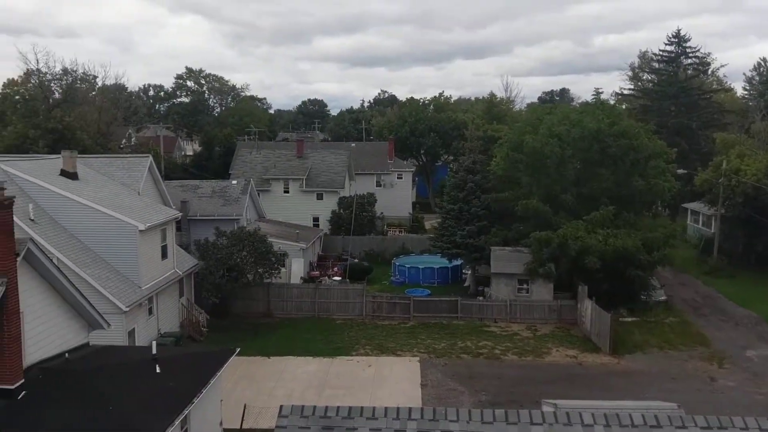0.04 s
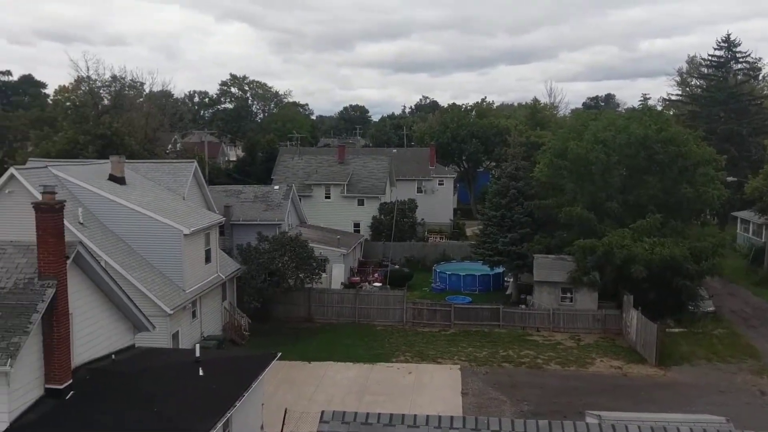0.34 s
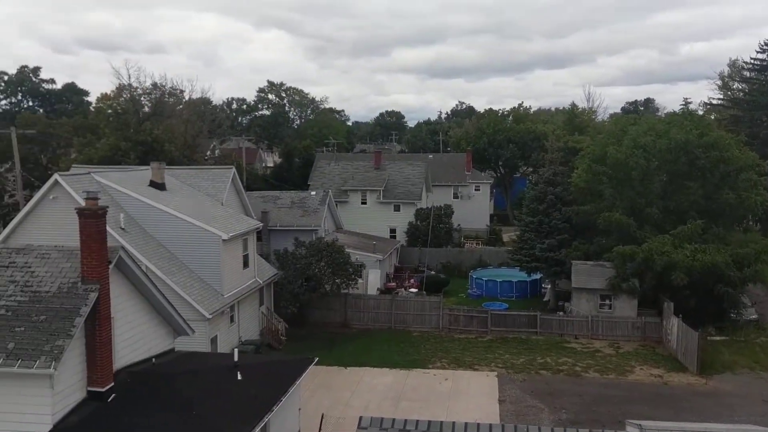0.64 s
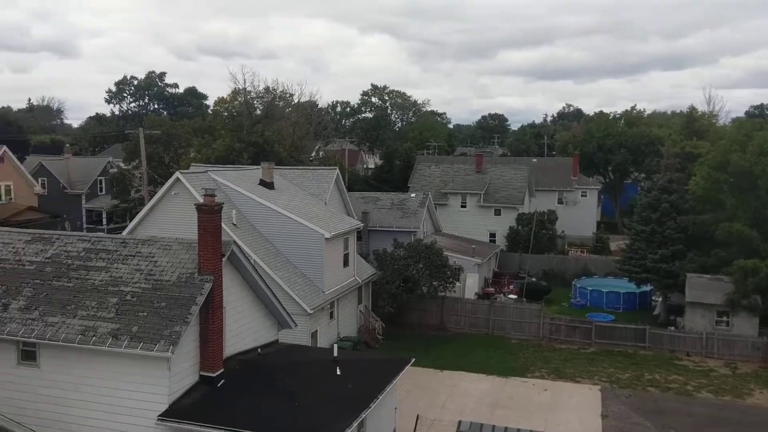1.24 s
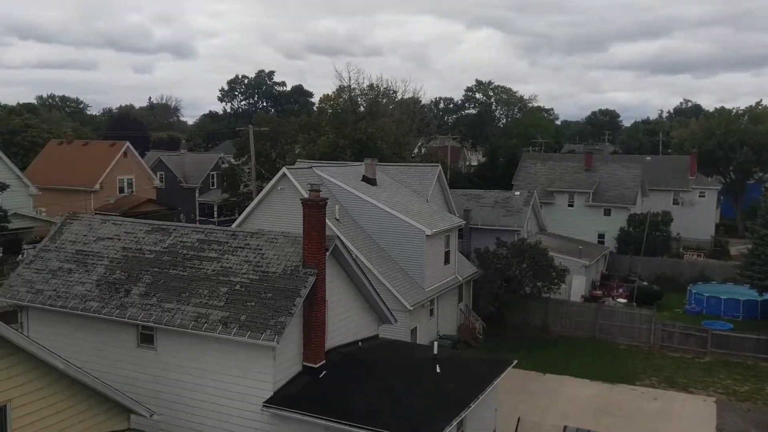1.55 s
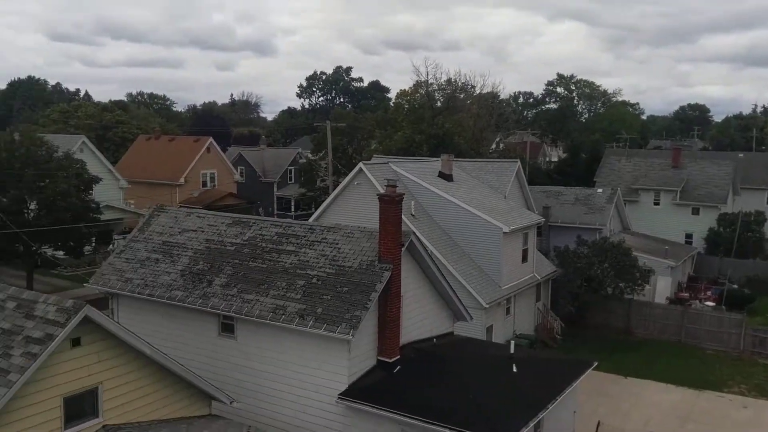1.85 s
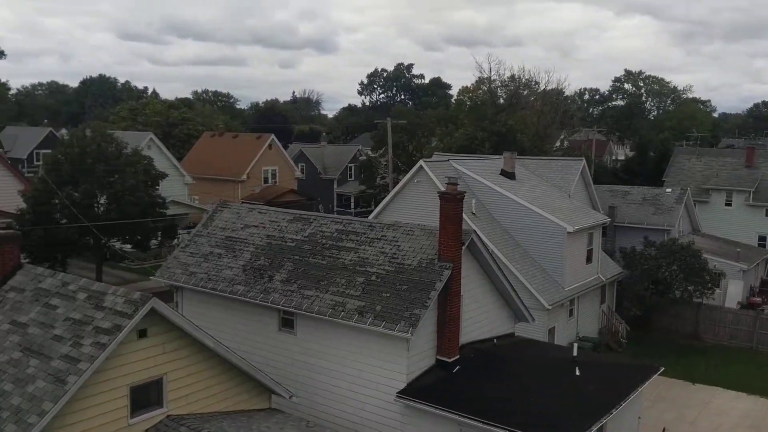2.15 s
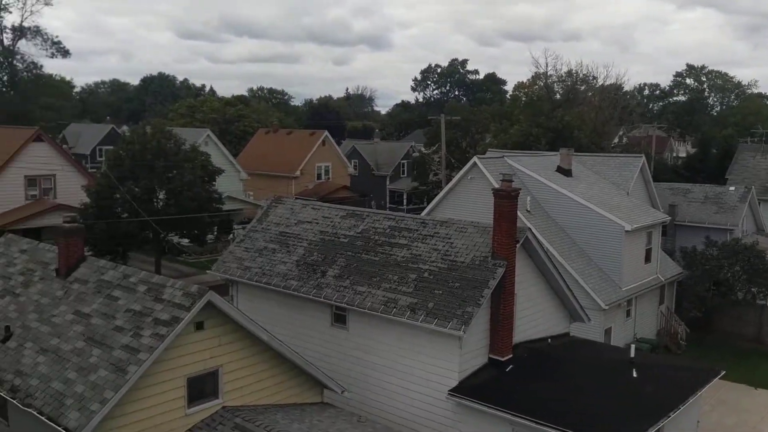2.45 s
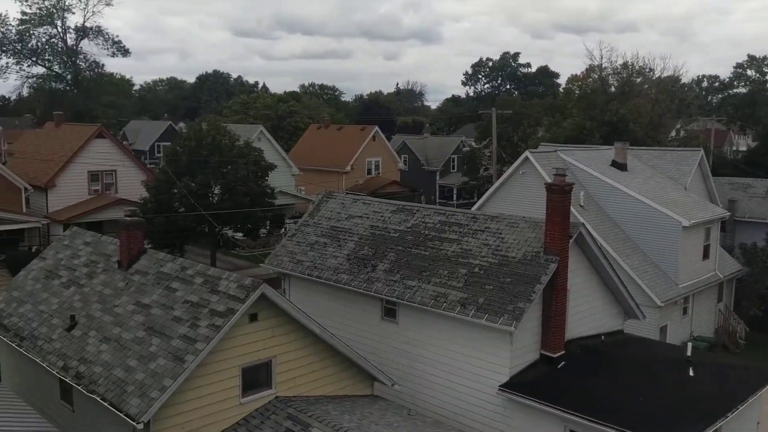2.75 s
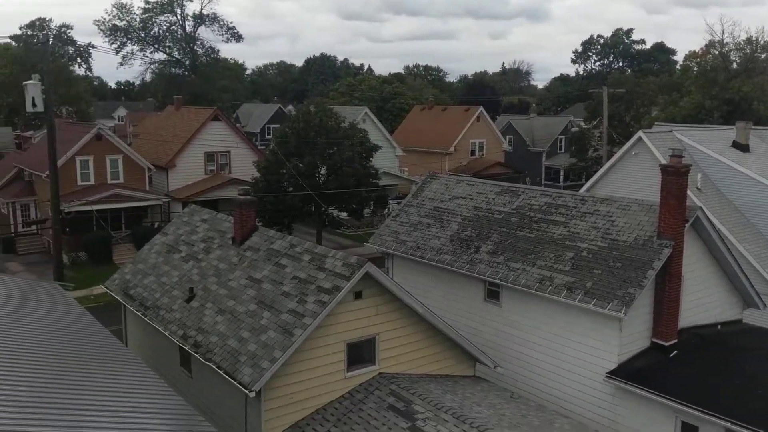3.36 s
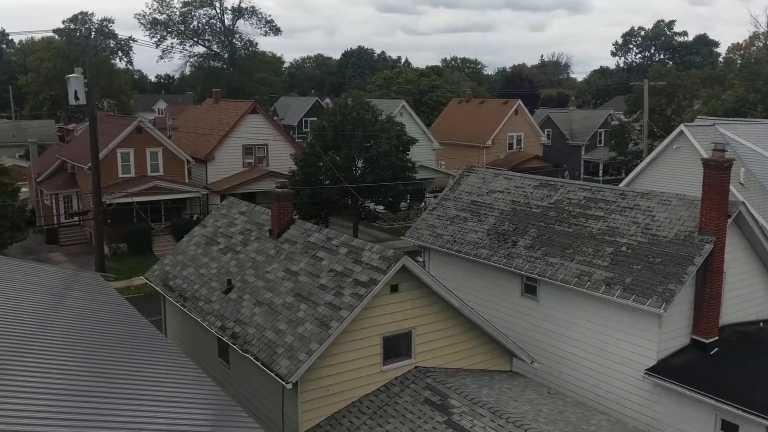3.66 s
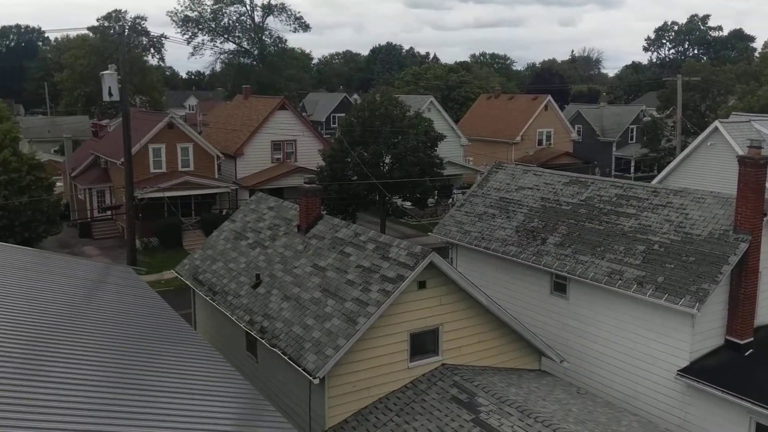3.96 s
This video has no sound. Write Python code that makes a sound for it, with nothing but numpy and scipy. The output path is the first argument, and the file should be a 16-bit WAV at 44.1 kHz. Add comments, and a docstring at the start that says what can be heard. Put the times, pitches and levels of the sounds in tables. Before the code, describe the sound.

Above suburban rooftops, a steady low machine hum blends with far traffic rumble. Gusts thump the microphone at the start and again midway, while faint leaves, insects and a few distant hoots sit underneath.

```python
"""Above the roofs of a quiet suburb, a motor hums steadily to the left over far traffic.
Its harmonics beat against the tones of a second machine. Turbulent wind buffets the left
microphone port, then the right. Leaves rustle and swish once, insects buzz in the trees
on the left, and something hoots faintly far away."""
import sys
import numpy as np
from scipy.fft import rfft, irfft, next_fast_len
from scipy.io import wavfile
from scipy.ndimage import map_coordinates

SR = 44100
rng = np.random.default_rng(int(sys.argv[2]) if len(sys.argv) > 2 else 0)


def materialize(psi):
    """Save the field psi as 16-bit PCM at rate SR to the path in sys.argv[1].

    A 1-D psi becomes a single channel; in a 2-D psi each row is a channel.
    """
    bounded = np.clip(np.atleast_2d(psi).T, -1, 1)
    quanta = np.round(bounded * 32767).astype(np.int16)
    wavfile.write(sys.argv[1], SR, quanta)


N = 176400
T = np.arange(N) / SR


def amp(db):
    """Amplitude ratio of a level: tenfold for every 20 dB."""
    return 10 ** (np.asarray(db) / 20)


def unit(x):
    """Normalisation of each channel to rms 1."""
    return x / np.sqrt(np.mean(x ** 2, axis=-1, keepdims=True) + 1e-20)


def along(points, hz):
    """Interpolation of (f/Hz, value) points on a logarithmic frequency axis."""
    f, values = np.transpose(points)
    return np.interp(np.log(hz + 1), np.log(f + 1), values)


def curves(rows):
    """Linear interpolation in time: one envelope for each column after t/s."""
    times, *columns = np.transpose(rows)
    return np.array([np.interp(T, times, column) for column in columns])


def wobble(rate):
    """Smooth random modulation: a spline through `rate` Gaussian values a second."""
    return map_coordinates(rng.standard_normal(512), [T * rate], mode="wrap")


def swell(at, width):
    """Gaussian envelope, down to 1/e at `width` seconds from its peak."""
    return np.exp(-((T - at) / width) ** 2)


def filtered(x, response):
    """Linear filtering: the spectrum of x times a frequency response."""
    size = next_fast_len(N + SR // 2)
    hz = np.fft.rfftfreq(size, 1 / SR)
    return irfft(rfft(x, size) * response(hz), size)[..., :N]


def noise(spectrum):
    """Two incoherent channels of rms 1; the spectrum gives their relative spectral density."""
    return unit(filtered(rng.standard_normal((2, N)), lambda hz: amp(along(spectrum, hz))))


def tone(cycles, left_db, right_db):
    """A wavering partial; it reaches the left port first and so leads in phase there."""
    lead_rad, waver_db = .75, .9
    phase = 2 * np.pi * (cycles + rng.random())
    pair = np.array([amp(left_db) * np.sin(phase + lead_rad), amp(right_db) * np.sin(phase)])
    return np.sqrt(2) * amp(waver_db * wobble(4.08)) * pair


def traffic():
    """Partial coherence: a far, even rumble whose likeness at the two ports varies with frequency."""
    # rumble spectrum: f/Hz, relative level/dB
    spectrum = [(15, -18), (30, -8), (60, 1.5), (100, -1.5), (150, -4), (200, -6), (280, -5), (350, -11.5),
                (440, -11), (530, -11.5), (600, -14.5), (800, -15.5), (1200, -19), (1700, -26),
                (2600, -32.5), (4000, -49)]
    # likeness of left and right: f/Hz, correlation coefficient
    correlation = [(60, -0.56), (200, 0.8), (400, 0.83), (700, 0.71), (1000, 0.1), (1300, -0.32),
                   (2400, -0.064)]

    def mid_side_gains(hz):
        angle = np.arccos(np.clip(along(correlation, hz), -1, 1)) / 2
        return np.array([np.cos(angle), np.sin(angle)])

    mid, side = filtered(noise(spectrum), mid_side_gains)
    level_db = -44.5 + 0.41 * wobble(4.68)
    return amp(level_db) * unit(np.array([mid + side, mid - side]))


def hoots():
    """Short far notes; random phase modulation stands for the blur of echoes between houses."""
    # notes: t/s, level/dB
    notes = [(2.565, -50.5), (2.82, -56), (3.08, -59), (3.27, -58)]
    pitch_hz = 536
    cycles = pitch_hz * T + 0.17 * wobble(40)
    return sum(swell(at, width=.045) * tone(cycles, db, db) for at, db in notes)


def insects():
    """Amplitude modulation makes a narrow noise band buzz and chirp over an even, broad chorus."""
    # chorus spectrum: f/Hz, relative level/dB
    chorus_spectrum = [(2200, -2), (3200, -0.5), (4000, -0.5), (4700, -2.5), (5300, -0.5), (5900, -6.5),
                       (7000, -5.5), (8200, -8), (9500, -13), (14000, -19)]
    # chorus envelope on the left: t/s, level/dB
    chorus_level = [(0, -65), (2, -65.5), (4, -67)]
    # buzz envelope on the left: t/s, level/dB
    buzz_level = [(0, -72.5), (.4, -71), (.7, -74), (1.3, -76.5), (1.8, -70.5), (2, -79), (2.1, -73),
                  (2.7, -75), (3.3, -72.5), (3.65, -79), (3.8, -69), (4, -83)]
    # louder chirps on the left: t/s, level/dB
    chirp_peaks = [(1.298, -65), (1.347, -62)]
    centre_hz, half_width_hz, ragged_db, right_db = 4620, 160, 2.3, -20.5
    white = rng.standard_normal((2, N))
    band = unit(filtered(white, lambda hz: 1 / (1 + ((hz - centre_hz) / half_width_hz) ** 2)))
    buzz = amp(curves(buzz_level) + ragged_db * wobble(35.26))
    chirps = sum(amp(db) * swell(at, width=.012) for at, db in chirp_peaks)
    chorus = amp(curves(chorus_level)) * noise(chorus_spectrum)
    return amp([[0], [right_db]]) * ((buzz + chirps) * band + chorus)


def leaves():
    """Many leaves add incoherently: a rustle fading on the right, one brighter swish on the left."""
    # rustle envelope: t/s, left level/dB, right level/dB
    rustle_level = [(0, -62, -54.5), (.4, -61.5, -54.5), (.9, -65, -58), (1.4, -76, -57), (2, -67, -59.5),
                    (2.45, -63, -57.5), (2.8, -69, -61.5), (4, -64, -63.5)]
    # rustle spectrum: f/Hz, relative level/dB
    rustle_spectrum = [(300, -9), (700, 0), (1000, -3), (1600, 1.5), (2200, 1), (2500, -4.5), (3000, -16),
                       (4500, -20.5), (7000, -36), (10000, -41)]
    # swish spectrum: f/Hz, relative level/dB
    swish_spectrum = [(1000, -3), (1500, 0), (1950, 7), (2600, -4), (3500, 3.5), (5500, -3), (8000, -7),
                      (10000, -18), (15000, -24)]
    peak_s, rise_s, fall_s = 2.37, .11, .28
    swish_db, right_offset_db = -61.5, -11
    rustle = amp(curves(rustle_level) + 1.1 * wobble(9.7)) * noise(rustle_spectrum)
    stir = swell(peak_s, np.where(T < peak_s, rise_s, fall_s))
    swish = amp(swish_db) * stir * noise(swish_spectrum)
    return rustle + amp([[0], [right_offset_db]]) * swish


def wind():
    """Turbulent pressure buffets each port independently; stronger gusts sound brighter."""
    # gusts at the left port: t/s, level/dB
    left_gusts = [(0, -21.5), (.07, -21), (.135, -23), (.18, -30), (.25, -26), (.31, -38), (.45, -48),
                  (1, -56), (4, -60)]
    # gusts at the right port: t/s, level/dB
    right_gusts = [(0, -50), (.22, -43), (.38, -31), (.43, -38), (.5, -35), (.64, -36), (.72, -42),
                   (1, -54), (1.55, -56), (1.66, -42), (1.74, -49), (1.9, -36.5), (2, -42), (2.11, -36.5),
                   (2.24, -41), (2.33, -56), (3.75, -58), (4, -42)]
    # spectrum of the deep buffeting: f/Hz, relative level/dB
    buffet = [(15, -17), (35, -5.5), (65, 2.5), (130, 2.5), (200, -7.5), (300, -18.5), (500, -35.5),
              (1200, -60), (3000, -98)]
    # spectrum of the higher flutter in strong gusts: f/Hz, relative level/dB
    flutter = [(60, -17), (150, -3.5), (260, -2.5), (400, -10), (550, -18), (900, -33), (2000, -63),
               (4000, -86)]
    eddy_db, eddies_per_s = 2.5, 35
    flutter_db = [[-12], [-2.5]]  # left, right; relative to the buffeting at the strongest gust
    flutter_growth = 0.81  # extra dB per dB of gust
    gust_db = np.vstack([curves(left_gusts), curves(right_gusts)])
    eddies = unit(amp(eddy_db * np.array([wobble(eddies_per_s), wobble(eddies_per_s)])))
    from_peak_db = gust_db - gust_db.max(axis=1, keepdims=True)
    brightness = amp(flutter_db + flutter_growth * from_peak_db)
    return amp(gust_db) * eddies * (noise(buffet) + brightness * noise(flutter))


def thumps():
    """Each of the strongest eddies gives a port one short swing of pressure, a Gaussian wave packet."""
    # single eddies: t/s, left level/dB, right level/dB, f/Hz
    eddies = [(0.059, -21, -47, 100), (0.075, -12.5, -48, 170), (0.123, -20.5, -33, 90),
              (0.247, -16.5, -42, 270), (0.267, -26, -47, 71), (0.34, -50, -23.5, 256),
              (0.488, -46, -23, 167), (.544, -35, -22, 256), (0.639, -50, -23, 182), (1.529, -26, -57, 170),
              (1.91, -50, -33, 110)]
    half_width_cycles = 0.85
    pressure = np.zeros((2, N))
    for at, left_db, right_db, hz in eddies:
        swing = np.sin(2 * np.pi * (hz * (T - at) + rng.random()))
        pressure += amp([[left_db], [right_db]]) * swell(at, half_width_cycles / hz) * swing
    return pressure


def second_machine():
    """Tones of fixed frequency; the low ones beat with nearby motor harmonics by superposition."""
    # tones: f/Hz, left level/dB, right level/dB
    tones = [(75.5, -58, -60), (106.7, -49.5, -57), (2466, -96, -86)]
    return sum(tone(hz * T, left, right) for hz, left, right in tones)


def motor():
    """Periodic motion: a governed motor radiates harmonics of its slightly drifting cycle rate."""
    # partials: harmonic number, left level/dB, right level/dB
    harmonics = [(2, -46.5, -58), (4, -41.5, -48), (6, -60, -62), (8, -45.5, -48.5), (9, -63, -67),
                 (10, -54, -56), (11, -54, -56), (12, -57, -59), (14, -64, -67), (16, -63, -65),
                 (18, -66, -68), (20, -69, -70), (22, -64, -66)]
    cycle_hz, drift_share = 23.512, .0008
    cycles = np.cumsum(cycle_hz * (1 + drift_share * wobble(1.2))) / SR
    return sum(tone(round(k) * cycles, left, right) for k, left, right in harmonics)


def scene():
    """Superposition: the pressures of all sources add at the two ports."""
    hum = motor() + second_machine()
    return hum + traffic() + wind() + thumps() + leaves() + insects() + hoots()


def record(dry):
    """The microphone adds its self-noise and passes nothing above its band limit."""
    # hiss spectrum: f/Hz, relative level/dB
    spectrum = [(1000, -5), (5000, -2.5), (7500, -17), (10000, -6.5), (11200, -3), (12200, 1.5),
                (13200, -1.5), (14500, -3), (16000, -7.5)]
    left_db, right_db, band_limit_hz = -72.5, -70.5, 15700
    hiss = amp([[left_db], [right_db]]) * noise(spectrum)
    return filtered(dry + hiss, lambda hz: hz < band_limit_hz)


dry = scene()
out = record(dry)
materialize(out)
```